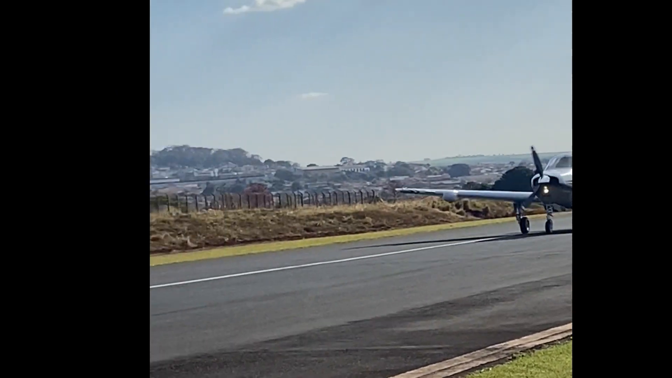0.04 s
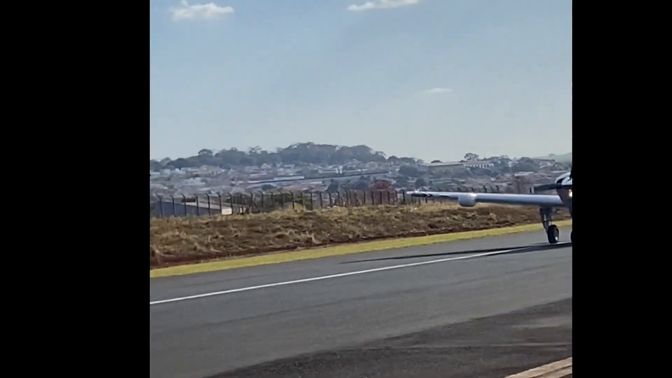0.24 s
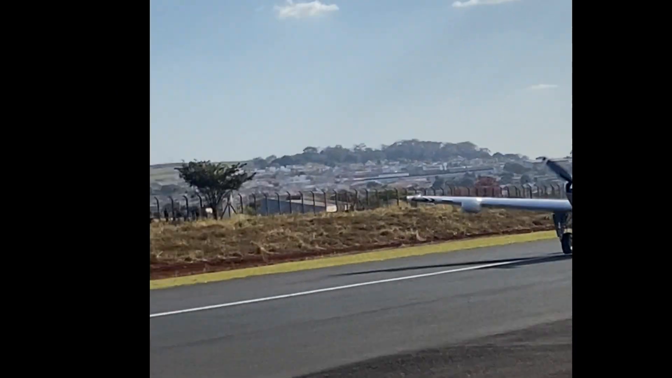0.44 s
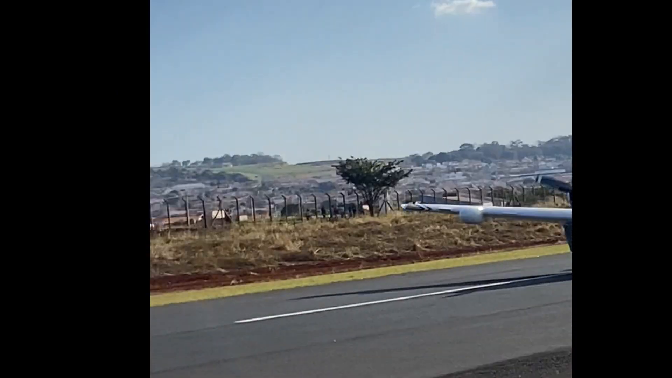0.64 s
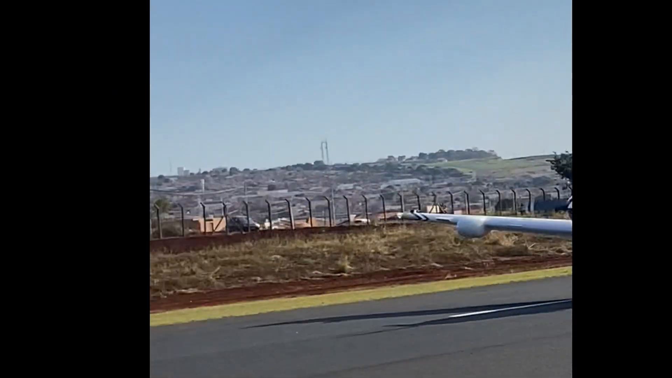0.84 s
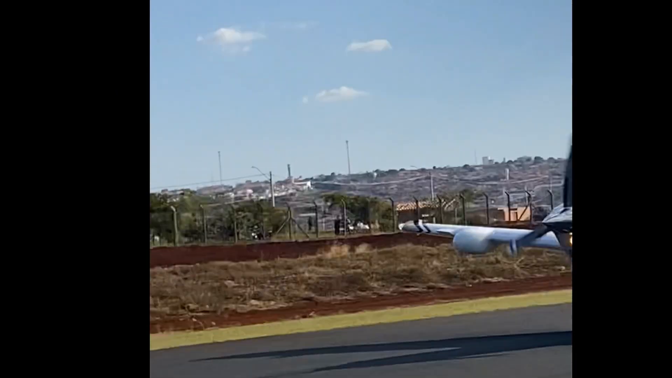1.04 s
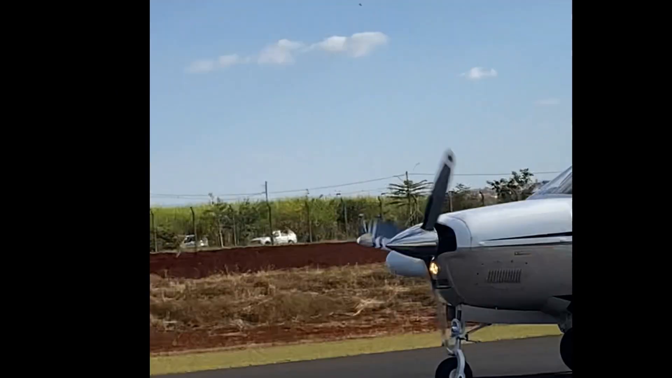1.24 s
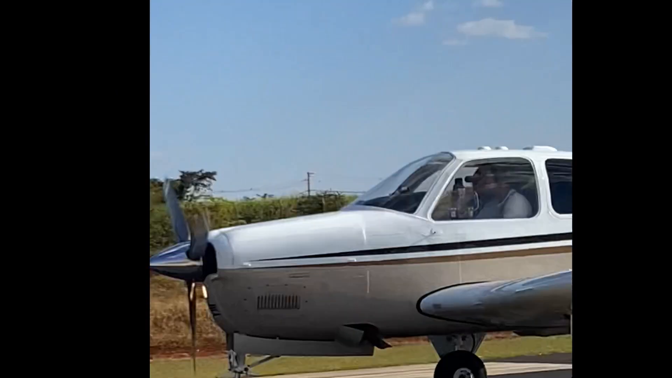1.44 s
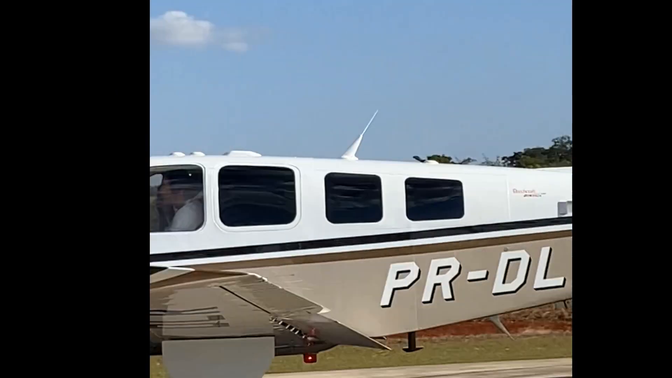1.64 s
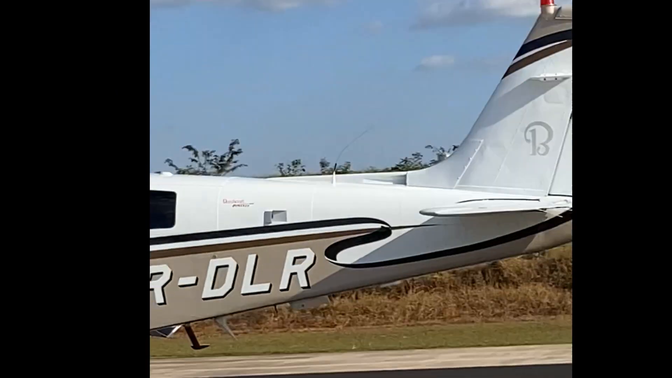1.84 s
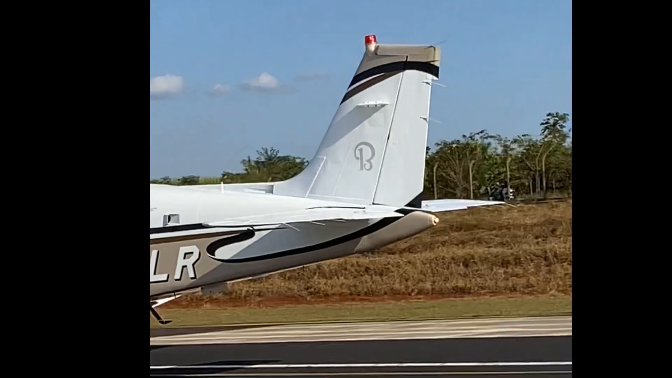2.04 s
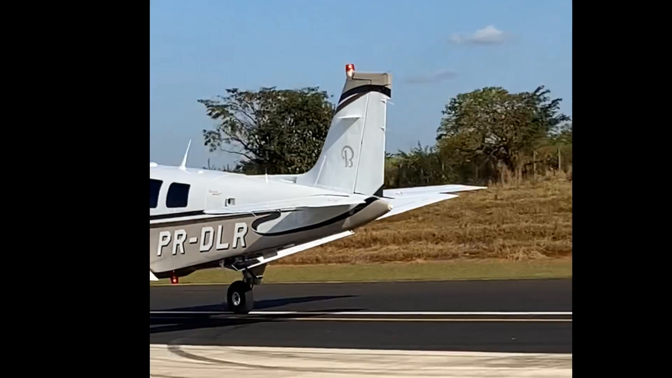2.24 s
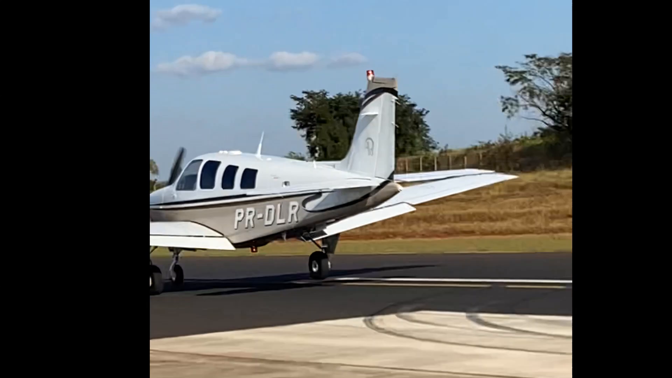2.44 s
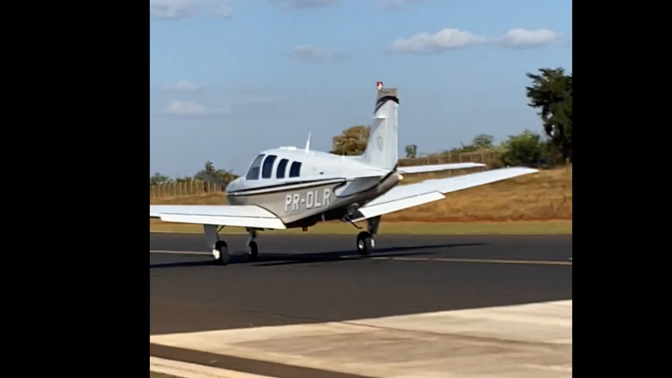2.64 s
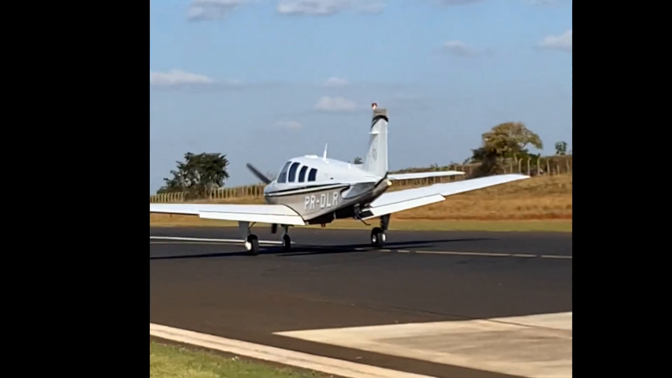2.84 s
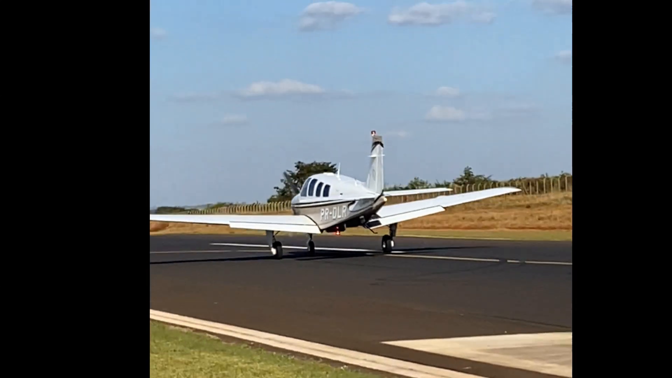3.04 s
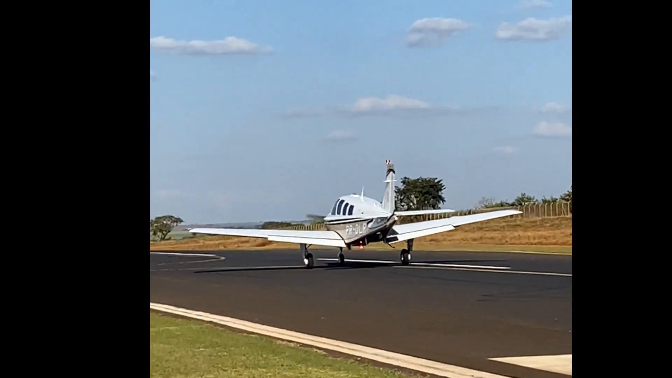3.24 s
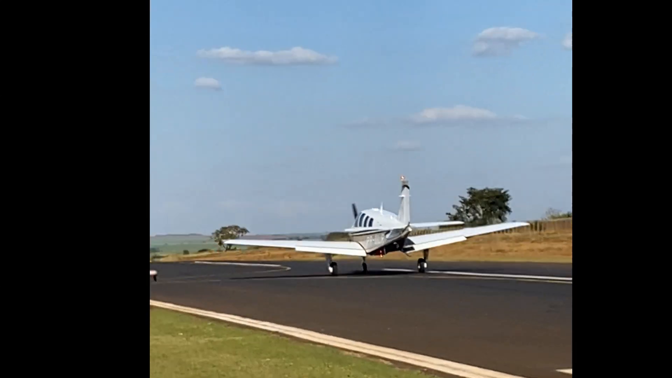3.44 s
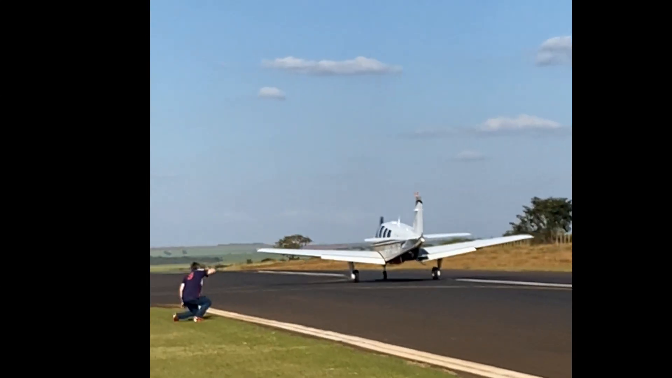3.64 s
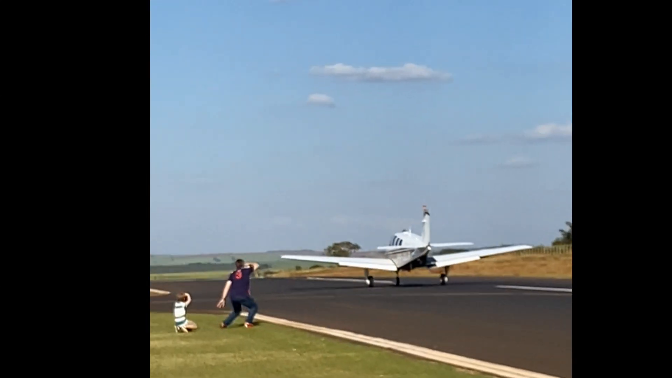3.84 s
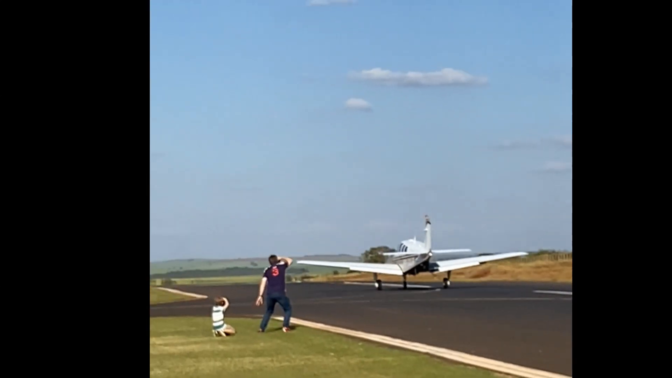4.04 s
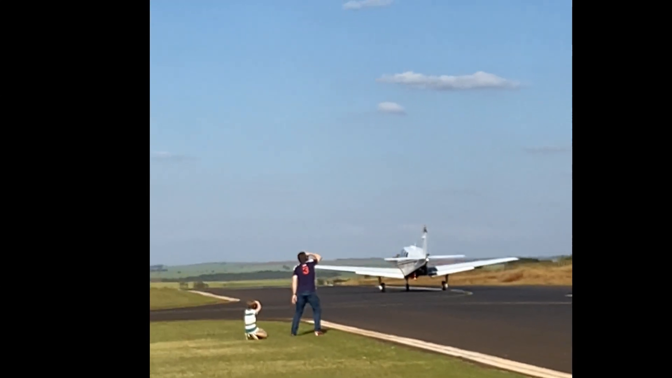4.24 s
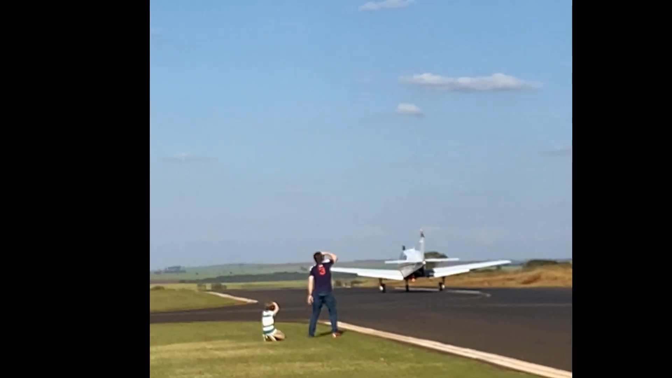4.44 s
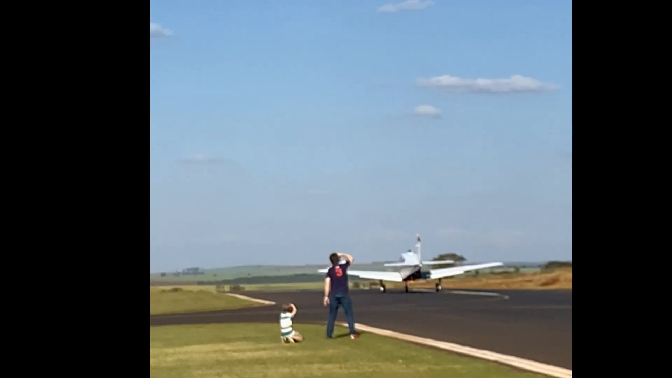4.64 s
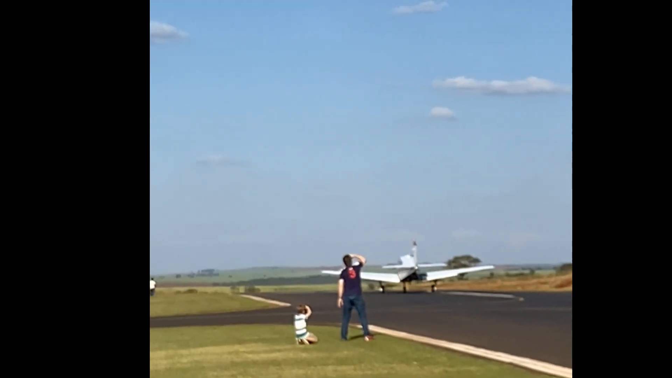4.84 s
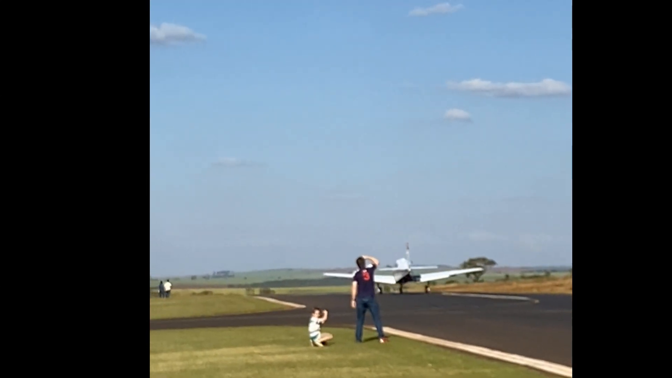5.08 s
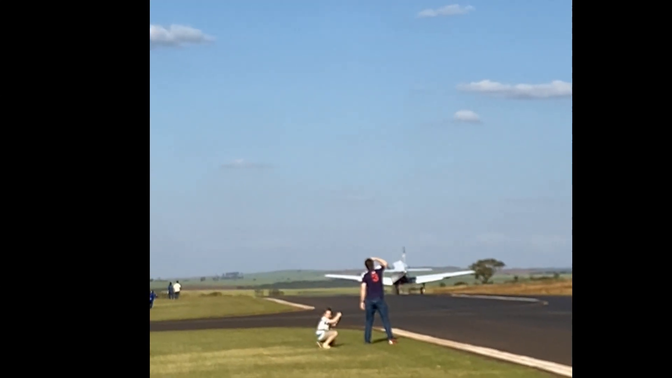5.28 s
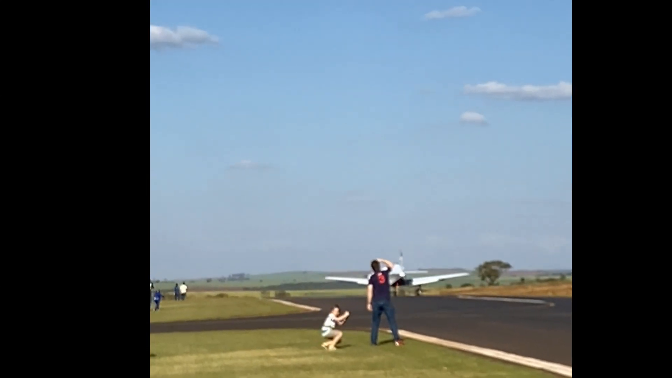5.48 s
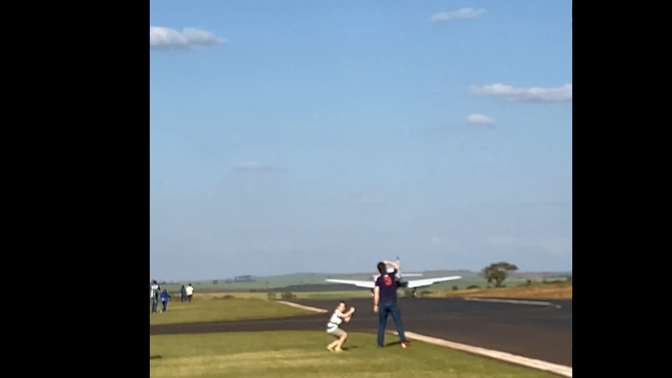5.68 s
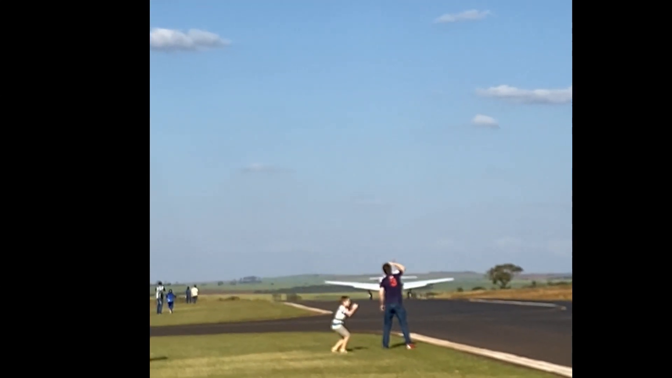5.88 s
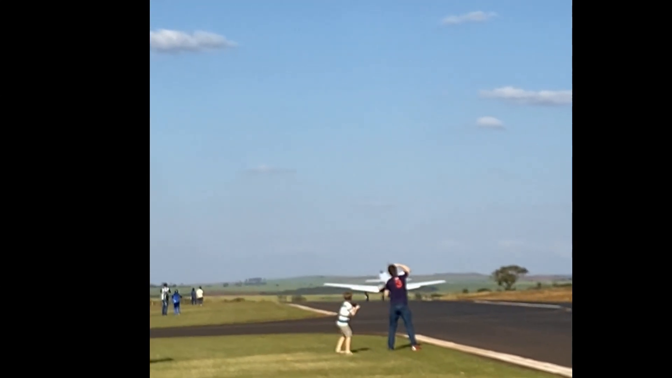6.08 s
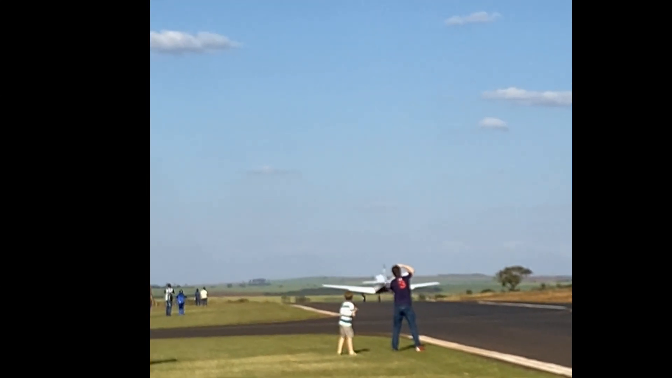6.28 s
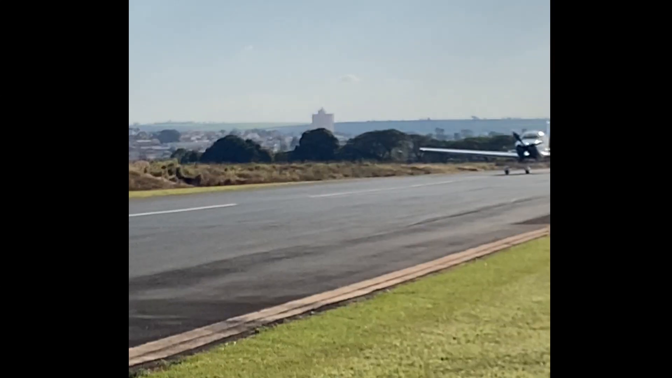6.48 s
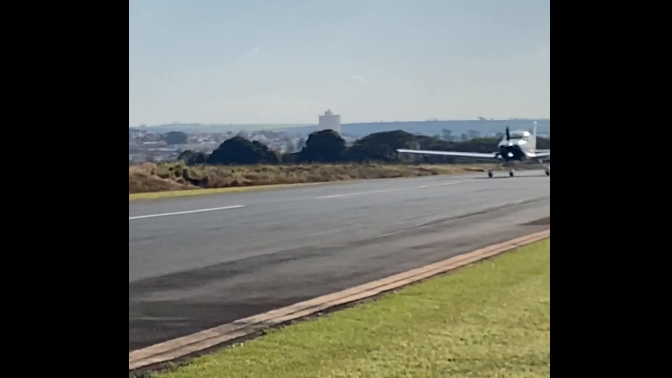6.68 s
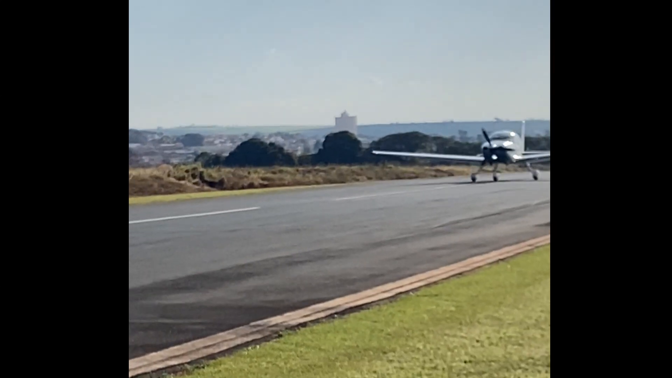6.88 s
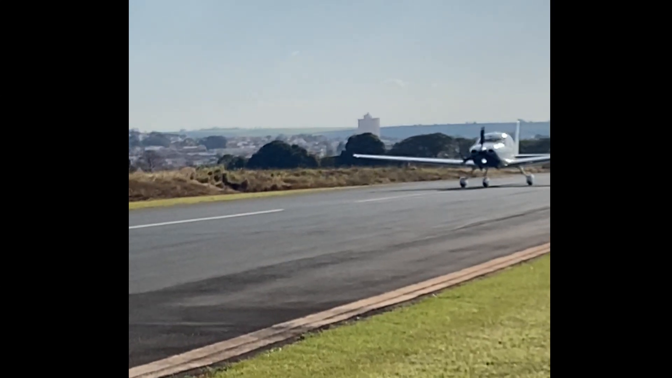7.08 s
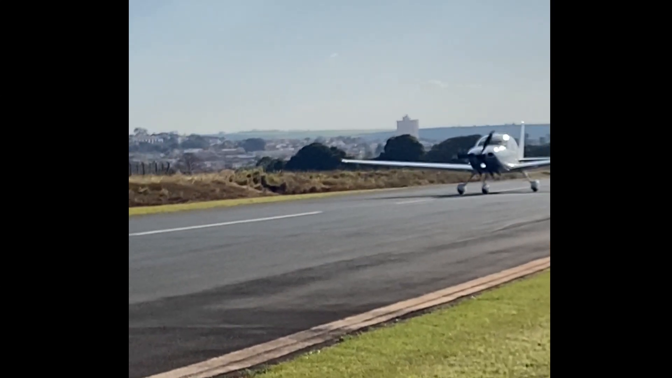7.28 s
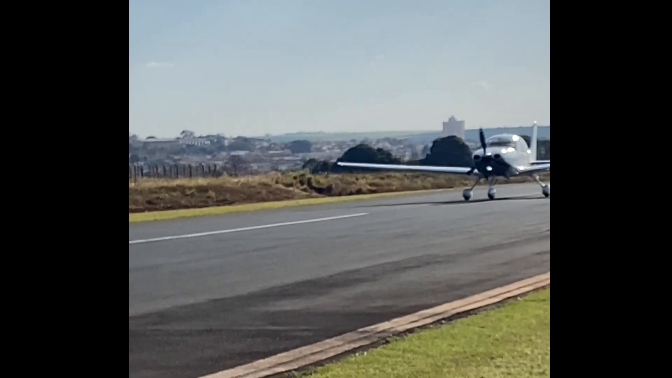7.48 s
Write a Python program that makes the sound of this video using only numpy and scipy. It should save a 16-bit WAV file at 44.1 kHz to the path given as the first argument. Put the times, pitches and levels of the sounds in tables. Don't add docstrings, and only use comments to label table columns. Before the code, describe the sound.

A propeller airplane rushes past on a runway, its blade buzz swelling then dropping in pitch, over another engine's drone; then another plane approaches, growing.

```python
import sys
import numpy as np
from scipy import signal
from scipy.fft import rfft, irfft, next_fast_len
from scipy.io import wavfile

SR = 44100
rng = np.random.default_rng(int(sys.argv[2]) if len(sys.argv) > 2 else 0)


def wav_record(signal):
    frames = np.transpose(np.atleast_2d(signal))
    bounded = np.clip(frames, -1, 1)
    quanta = np.round(bounded * 32767).astype(np.int16)
    wavfile.write(sys.argv[1], SR, quanta)


def elevation(decibels):
    levels = np.asarray(decibels, float)
    return 10 ** (levels / 20)


N = 331632
STEP = 40
STEP_S = np.arange(N // STEP + 2) * STEP / SR
CUT_S, APPROACH_START_S = 6.4402, 6.4888

# frequency in Hz, slipstream in dB per Hz, share of its swing,
# loss behind the plane in dB, steady engine in dB per Hz.
ROAR = [(59.77, -69.5, .3, -1, -59), (204, -50, 0.8, -5, -79), (482, -51.5, 1.08, 3, -74.5),
        (1000, -53.5, 0.83, 2.5, -75), (1660, -54.5, 1.07, 7, -77.5), (2520, -62, 1.01, 6, -81.5),
        (3750, -67, 0.63, 10, -92.5), (9900, -76, 1.58, 11.5, -99)]
# time in seconds, level in dB.
WASH = [(0.0, -0.5), (1.05, -0.5), (1.3, -3.5), (1.65, -9), (1.87, -5.5), (2.05, -13), (2.22, -11.5),
        (2.6, -22), (2.7, -14), (2.9, -12.5), (3.1, -20.5), (3.5, -23.5), (3.75, -35.5), (6.0, -35.5),
        (6.44, -22)]
# frequency in Hz, first and last level in dB per Hz, bend.
APPROACH_ROAR = [(60, -48, -52, 0.98), (200, -57.5, -51.5, 1.5), (500, -51, -61, 0.96),
                 (1000, -70, -55, 0.87), (1700, -74, -64.5, 0.76), (2600, -82.5, -72.5, 2.4),
                 (4000, -89, -73.5, 2.2), (10000, -101, -99, 1.1)]
# frequency in Hz, gain in dB.
NOISE_COLOUR = [(45, -6), (70, 1.5), (250, 3), (400, -1.5), (550, -1), (750, 4.5), (1100, 1), (1800, 1),
                (2600, 1.5), (5000, 2.5), (7200, 6), (10000, 10), (13000, 8.5), (15500, -18.5)]
# frequency in Hz, share for a close source, for a far one.
UNLIKE = [(100, .07, .07), (300, 0.43, 0.77), (690, 0.28, 0.82), (1524, 0.24, 0.51), (3953, 0.2, 0.29),
          (7260, 0.43, 0.79), (13000, 0.34, 0.81)]
# time in seconds, how far from 0 (full) to 1 (gone).
TOP_THINNED = [(0, 0), (2.3, 0), (2.6, 1), (6.12, 1), (6.2, 0), (6.44, 0), (6.49, 1), (6.85, 1), (7.2, 0),
               (7.52, 0)]
# time in seconds, level in dB, length in seconds.
UNEVEN_PUFFS = [(2.637, -57, 0.1), (2.77, -56, .07), (2.933, -55, .08), (3.086, -57, 0.044),
                (3.202, -60, 0.061), (5.022, -59, 0.067), (5.174, -57.5, 0.072), (5.427, -58.5, 0.15),
                (5.833, -56, 0.14), (6.278, -64, 0.036)]
# frequency in Hz, lead of the left in radians.
PORT_PHASE = [(0, 0), (950, -0.7), (2500, 0.7), (3270, -0.1), (4480, 0.8), (5080, 0.0), (6980, 3.2),
              (7580, 3.2), (10100, 6.2), (10900, 6.4), (11200, 7.0), (13200, 9.3), (14000, 9.6),
              (16400, 12.5)]
# frequency in Hz, left minus right in dB.
PORT_BALANCE = [(60, 2.5), (110, -0.5), (200, 2), (380, 1.5), (700, -1.5), (1290, -3.5), (2380, 1),
                (4400, -1.5), (8120, -1.0), (15000, 0)]

# time in seconds, exhaust rate in Hz.
APPROACH_HZ = [(6.49, 73.8), (6.99, 74.0), (7.52, 74.3)]
# order, first and last level in dB, bend (under 1 early, over 1 late).
APPROACH_SWELL = [(2, -73.5, -21.5, 0.51), (4, -34, -26, 1.54), (9, -38, -23, 0.28), (15, -45, -31, 0.45)]
# multiple of the exhaust rate, level in dB.
APPROACH_SHAPE = [(1, -12.5), (2, -1.5), (3, -5.5), (4, -5.5), (5, -4), (6, -1.5), (7, -5), (8, 1),
                  (9, 10.5), (10, -5.5), (11, 4.5), (12, -9.5), (13, -7), (14, -13.5), (15, -8.5),
                  (16, -16.5), (17, -28.5), (18, -21.5), (19, -15), (20, -15), (21, -22), (22, -21.5),
                  (23, -27.5), (24, -32)]

# time in seconds, firing rate in Hz.
NEARBY_HZ = [
    (0.0, 91.5),
    (0.6, 92.4),
    (1.5, 95.7),
    (2.6, 99.8),
    (3.2, 101.2),
    (4.8, 101.4),
    (5.1, 99.9),
    (5.75, 94.1),
    (6.44, 91.5),
]
# time in seconds, firing order in dB.
NEARBY_LEVEL = [(0.0, -12), (0.5, -11.5), (1.0, -14), (1.25, -17.5), (1.5, -21), (2.0, -26), (2.25, -22.5),
                (2.5, -25), (2.75, -18.5), (4.9, -17), (6.44, -19)]
# order, level in dB at full throttle,
# slope in dB per Hz below it, gain in dB when faced.
FOUR_STRONG = [(1.5, -16, 0.89, -1), (2, -16, 0.06, -4), (2.5, -19, 0.16, 9)]
# halves of the firing rate, level in dB.
FOUR_WEAK = [(1, -4.5), (6, -13), (7, -30.5), (8, -30), (9, -50.5), (10, -38.5)]

# time in seconds, first-order hum in dB, blade-tip slap in dB.
PASSING_LEVEL = [(0.0, -17, -45), (0.3, -14, -38.5), (0.8, -11.5, -30.5), (1.08, -9.5, -26.5),
                 (1.3, -12, -24.5), (1.6, -13.5, -18.5), (1.85, -14, -25.5), (2.16, -20, -39),
                 (2.6, -22.5, -47), (2.85, -21, -41.5), (3.4, -22, -48), (3.7, -27.5, -56),
                 (4.4, -31, -64.5), (5.2, -33.5, -68), (6.44, -41.5, -56.5)]
# order, level in dB from ahead, abeam, from behind.
SLAP_ORDERS = [(2, 12, 8.5, 14.7), (3, 3, 11.6, 6.5)]
# order, time in seconds, depth in dB, half length in seconds.
NULLS = [
    (1, 1.575, 12.5, 0.073),
    (2, 1.53, 11.5, 0.064),
    (3, 1.6, 6, 0.09),
    (3, 1.6, 4.5, 0.18),
    (2, 2.5, 11, 0.2),
    (2, .1, -2.5, 0.21),
]
# sixths of the blade rate, level in dB.
SIX_EXHAUST = [(2, -20), (3, -4), (4, -6), (5, -13.5), (7, -20.5), (8, -7), (9, 3), (11, -11), (13, -8.5),
               (15, 1.5), (16, -8.5), (19, -11), (21, -10), (23, -6), (27, -9.5), (33, -19), (39, -25.5)]
# time in seconds, level in dB.
POPS = [
    (2.0, -66),
    (2.25, -41),
    (2.6, -53.5),
    (2.66, -39.5),
    (2.85, -40),
    (3.1, -47),
    (3.4, -48),
    (3.7, -77.5),
]

BLADE_HZ, SPEED_M_S = 136.5, 35.0
ABEAM_S, ABEAM_M = 1.697, 16.4


def in_time(rows):
    s, *columns = np.transpose(rows)
    return [np.interp(STEP_S, s, c) for c in columns]


def smooth(control):
    return np.interp(np.arange(N) / STEP, np.arange(len(control)), control)


def at_hz(points, hz, order=1):
    points = np.array(points)
    return np.interp(np.log(hz), np.log(points[:, 0]), points[:, order])


def between(level_db, nodes, k):
    place = np.interp(np.log(k), np.log(nodes), np.arange(len(nodes)))
    low = min(int(place), len(nodes) - 2)
    return level_db[low] + (place - low) * (level_db[low + 1] - level_db[low])


def drift(rate_hz):
    r = np.exp(-2 * np.pi * STEP * rate_hz / SR)
    white = rng.standard_normal(len(STEP_S) + 2000)
    slow = signal.lfilter([1], [1, -2 * r, r * r], white)[2000:]
    return slow / slow.std()


def band(x, lo_hz, hi_hz):
    y = signal.sosfilt(signal.butter(2, [lo_hz, hi_hz], "band", fs=SR, output="sos"), x)
    return y / y.std()


def turn(rate_hz, jitter):
    return smooth(2 * np.pi * np.cumsum(rate_hz) * STEP / SR + jitter * drift(50))


def tone(angle, k, level_db, flutter_db, phase=None):
    if phase is None:
        phase = rng.uniform(0, 2 * np.pi)
    level = np.sqrt(2) * elevation(level_db + flutter_db * drift(10.0))
    return smooth(level) * np.cos(k * angle + phase)


def receding():
    along_m = SPEED_M_S * (STEP_S - ABEAM_S)
    return along_m / np.hypot(along_m, ABEAM_M)


def nearing(first_db, last_db, bend):
    done = np.clip((STEP_S - APPROACH_START_S) / 0.91, 0, 1)
    return first_db + (last_db - first_db) * done ** bend


def puff_rows():
    s = 3.34 + 0.129 * np.arange(13)
    off_s = np.abs(s - 3.85)
    flutter = zip(s, -66 + 4 * off_s, 0.031 + 0.016 * off_s)
    return [*flutter, *UNEVEN_PUFFS]


def puff_shapes():
    return [np.exp(-((STEP_S - s) / (0.68 * length)) ** 4) for s, db, length in puff_rows()]


def puffs():
    swell = sum(elevation(db - 2.0) * shape for (s, db, length), shape in zip(puff_rows(), puff_shapes()))
    hiss = band(rng.standard_normal((2, N)), 7700, 9900)
    return smooth(swell) * hiss * [[1], [.45]]


def noise_levels():
    wash_db, = in_time(WASH)
    out = []
    for (hz, db, share, behind_db, steady_db), (_, *swell) in zip(ROAR, APPROACH_ROAR):
        passing_db = db + share * wash_db - behind_db * (1 + receding()) / 2
        first_db = 20 * np.log10(np.hypot(elevation(passing_db), elevation(steady_db)))
        out.append(np.where(STEP_S < CUT_S, first_db, nearing(*swell)))
    out[-1] = out[-1] - 11 * in_time(TOP_THINNED)[0]
    return out


def roar(beat, far):
    per_hz = noise_levels()
    nodes = [row[0] for row in ROAR]
    edges = 42 * 2 ** np.arange(0, 9, .5)
    white, together, out = rng.standard_normal((2, 2, N)), drift(13), 0
    for k, (lo, hi) in enumerate(zip(edges, np.append(edges[1:], 16000))):
        hz = np.sqrt(lo * hi)
        levels = per_hz[:-1] + [np.maximum(per_hz[-1], -101. if hz < 8000 else -125.)]
        db = between(levels, nodes, hz) + at_hz(NOISE_COLOUR, hz) + 10 * np.log10(hi - lo)
        db = db + 0.84 * together + 0.72 * drift(16) + 1.2 * far * drift(1.7)
        if hz > 11000:
            db = db + 0.23 * np.minimum(levels[-1] + 72, 0)
        own = (1 - far) * at_hz(UNLIKE, hz) + far * at_hz(UNLIKE, hz, order=2)
        own = np.clip(own, 0, 1)
        depth = at_hz([(300, 0.0), (900, 0.0), (2500, 0.22), (10000, 0.0)], hz)
        shared, apart = (1 + np.clip(depth, 0, 1) * beat) * band(white[k % 2], lo, hi)
        shared = smooth(elevation(db) * np.sqrt(1 - own ** 2)) * shared
        out = out + np.array([shared, smooth(elevation(db) * own) * apart])
    return exhaust_pipe(out, far)


def exhaust_pipe(noise, far):
    resonance = signal.lfilter(*signal.iirpeak(1780, 1780 / 330, fs=SR), noise)
    return noise + smooth(far) * (elevation(6) - 1) * resonance


def far_drone():
    return tone(turn(np.full(len(STEP_S), 83.0), jitter=0.24), 0.87, -38, 1.3)


def approaching_plane():
    angle = turn(in_time(APPROACH_HZ)[0], jitter=0.0049)
    shape = {round(k): db for k, db in APPROACH_SHAPE}
    nodes = [round(row[0]) for row in APPROACH_SWELL]
    gain_db = [nearing(*swell) - shape[round(k)] for k, *swell in APPROACH_SWELL]
    out = 0
    for k, db in shape.items():
        phase = 1.2 - 2.87 * np.log(k) + np.pi / 2 * (k % 2)
        out = out + tone(angle, k, between(gain_db, nodes, k) + db, 1.17, phase)
    return out, 2 * angle


def nearby_engine():
    hz, firing_db = in_time(NEARBY_HZ) + in_time(NEARBY_LEVEL)
    faced = np.clip((firing_db + 17.5) / 6, 0, 1)
    below_full_hz = 100.8 - hz
    level_db = [firing_db]
    for k, db, slope, faced_db in FOUR_STRONG:
        level_db.append(firing_db + db + slope * below_full_hz + faced_db * faced)
    angle = turn(hz, jitter=0.013)
    out = sum(tone(angle, 1 + k / 2, db, 0.36) for k, db in enumerate(level_db))
    out = out + sum(tone(angle, round(k) / 2, level_db[2] + db, 0.5) for k, db in FOUR_WEAK)
    return out, angle


def pops(blades):
    at = np.flatnonzero(np.diff(blades // (4 * np.pi)))
    luck = rng.standard_normal((len(at), 2))
    out = np.zeros(N)
    for side, (lo_hz, hi_hz) in enumerate([(900, 1500), (1450, 1820)]):
        clicks = np.full(N, 1e-18)
        clicks[at] = elevation(4.5 * np.clip(luck[:, side], -2, 1.5))
        out += band(clicks, lo_hz, hi_hz)
    return smooth(elevation(in_time(POPS)[0])) * out


def slap_fall(k, away):
    if k == 4:
        return -(3.0 + 2.4 * np.exp(-((away + .5) / 0.18) ** 2))
    fall_db = -(3.2 - 0.71 * (1 - away ** 2)) * max(k - 6, 0)
    fall_db = fall_db - (.3 + 0.37 * away + .15 * away ** 2) * max(k - 8, 0) ** 2
    return fall_db + (.2 - 3.4 * away) * (k == 5)


def passing_plane():
    away = receding()
    hum_db, slap_db = in_time(PASSING_LEVEL)
    level_db = [hum_db]
    level_db += [slap_db + np.interp(away, [-1, 0, 1], db) for k, *db in SLAP_ORDERS]
    level_db.append(slap_db)
    for k, s, depth_db, half_s in NULLS:
        dip_db = depth_db * np.exp(-((STEP_S - s) / half_s) ** 2)
        level_db[round(k) - 1] = level_db[round(k) - 1] - dip_db
    angle = turn(BLADE_HZ * (1 - SPEED_M_S * away / 343), jitter=0.0055)
    behind = smooth(np.clip(away * 4.97 - 3.6, 0, 1))
    out = 0
    for k in range(1, 18):
        db = between(level_db, [1, 2, 3, 6], k) + slap_fall(k, away)
        smear = behind * rng.uniform(-1.44, 2.42)
        out = out + tone(angle, k, db, 0.093 + 0.15 * k, 2.5 - 3.8 * np.log(k) + smear)
    exhaust_db = -23.5 + 1.69 * (hum_db - hum_db.max())
    out = out + sum(tone(angle, round(k) / 6, exhaust_db + db, 1.1) for k, db in SIX_EXHAUST)
    return out + pops(angle), angle


def ports(shared, own):
    size = next_fast_len(N + 4096)
    hz = np.arange(size // 2 + 1) * SR / size
    half_phase = np.exp(.5j * np.interp(hz, *np.transpose(PORT_PHASE)))
    half = elevation(at_hz(PORT_BALANCE, hz + 1) / 2) * half_phase
    passed = (hz / 42) ** 3 / np.sqrt(1 + (hz / 42) ** 6)
    passed = passed * (hz < 15950)
    a, b = rfft(shared, size) * passed, rfft(own, size) * passed
    return irfft(np.array([(a + b) * half, (a - b) / half]), size)[:, :N]


def thin_bands(pair, far):
    def part(x, edges):
        return signal.sosfiltfilt(signal.butter(6, edges, "band", fs=SR, output="sos"), x)
    shut = smooth(in_time(TOP_THINNED)[0] * (1 - np.clip(sum(puff_shapes()), 0, 1)))
    pair = pair - .5 * part(pair.mean(axis=0), [6850, 7750])
    pair = pair - .55 * shut * smooth(far) * part(pair, [4900, 8800])
    pair = pair - smooth(STEP_S > 5.6) * part(pair, [12600, 20000])
    sinking = (STEP_S > 5.56) * (STEP_S < 6.1)
    shut = np.maximum(shut, smooth(sinking))
    return pair - shut * part(pair, [8800, 20000])


def scene():
    t = np.arange(N) / SR
    drone = far_drone()
    approach, slaps = approaching_plane()
    nearby, firing = nearby_engine()
    passing, blades = passing_plane()
    early = t < CUT_S
    far = np.clip((STEP_S - 2.0) / 2.039, 0, 1) * (STEP_S < CUT_S)
    blend = smooth(far)
    early_beat = (1 - blend) * np.cos(blades + .5) + blend * np.cos(firing)
    beat = np.where(early, early_beat, np.cos(slaps + .5))
    shared, own = roar(beat, far) + puffs()
    engines = np.where(early, passing + nearby + drone, approach)
    echo = 0.027 * (np.roll(engines, 150) - 1.4 * np.roll(engines, 170))
    heard = thin_bands(ports(engines + shared, own + echo), far)
    return heard * (0.0027 + early + np.clip((t - APPROACH_START_S) / 0.0032, 0, 1))


def roll_off(x):
    return signal.sosfilt(signal.butter(12, 16820, fs=SR, output="sos"), x)


def record(dry):
    rounded = 1.134 * np.tanh(dry / 1.22)
    return roll_off(rounded)


dry = scene()
out = record(dry)
wav_record(out)
```